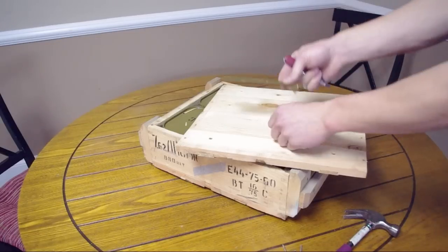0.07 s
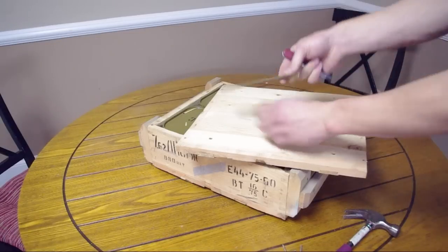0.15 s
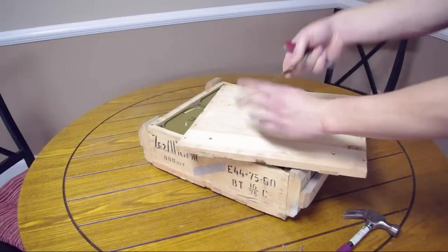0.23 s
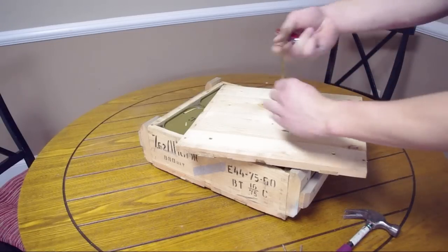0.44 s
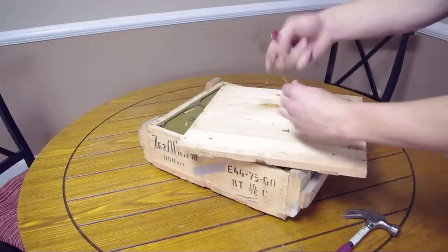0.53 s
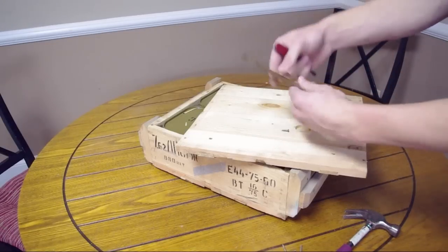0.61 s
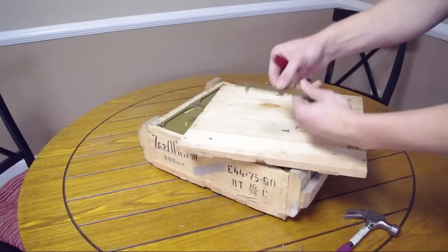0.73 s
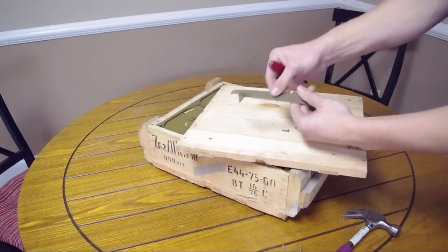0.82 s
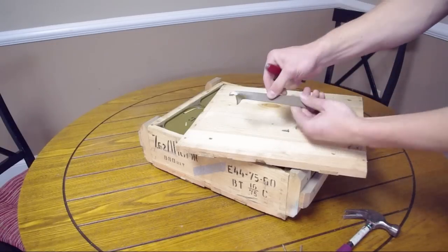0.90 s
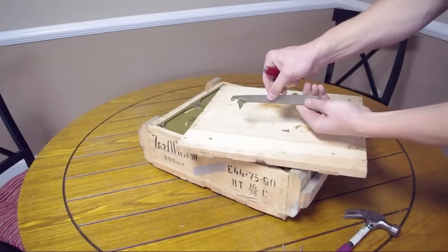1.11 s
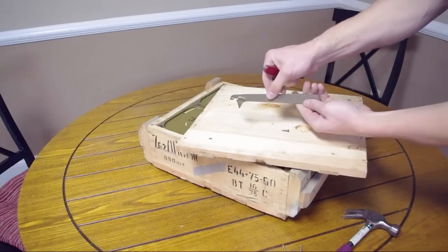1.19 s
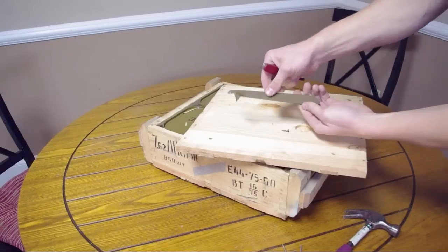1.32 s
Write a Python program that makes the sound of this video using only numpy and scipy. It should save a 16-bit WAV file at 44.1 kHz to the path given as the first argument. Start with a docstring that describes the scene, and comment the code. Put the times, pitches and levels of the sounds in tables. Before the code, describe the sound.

Two sharp, close clacks of metal on a wooden crate ring briefly in a small room with a low hum. Faint finger slides on the steel and a soft scrape across the lid follow.

```python
"""A small room with close walls, one microphone near a wooden crate; quiet air and a low hum throughout.
Arms rustle, then a flat steel bar knocks on the loose lid as it is picked up: a light clack at 0.22 s,
a firm one at 0.27 s. Bar and boards ring briefly, and the walls and the room answer.
From 0.4 s fingers slide and brush along the steel, which sings faintly. In the second half they ease
the bar into place on the lid with a soft scrape."""
import sys
import numpy as np
from scipy import signal
from scipy.fft import rfft, irfft, next_fast_len
from scipy.io import wavfile
from scipy.ndimage import uniform_filter1d

SR = 44100
rng = np.random.default_rng(int(sys.argv[2]) if len(sys.argv) > 2 else 0)


def transcribe(u):
    """Save the signal u as a 16-bit wav file named by the first command-line argument.

    u: samples, shape (n,) or (channels, n), limited to [-1, 1]; the rate is SR.
    q: integer samples, one column per channel.
    """
    v = np.clip(np.atleast_2d(u).T, -1, 1)
    q = np.round(v * 32767).astype(np.int16)
    wavfile.write(sys.argv[1], SR, q)


N = 59535
TIME = np.arange(N) / SR


def undb(db):
    """Decibels to gain."""
    return 10 ** (np.asarray(db) / 20)


def at_hz(hz, table, column=1):
    """Read a table column on a log-frequency axis."""
    table = np.array(table, float)
    return np.interp(np.log(np.maximum(hz, 1)), np.log(table[:, 0]), table[:, column])


def colour(x, points):
    """Minimum-phase filter through points of (frequency [Hz], gain [dB])."""
    size = 2 * next_fast_len(N)
    cepstrum = irfft(np.log(undb(at_hz(np.fft.rfftfreq(size, 1 / SR), points))))
    cepstrum[1:size // 2] *= 2
    cepstrum[size // 2 + 1:] = 0
    return irfft(rfft(x, size) * np.exp(rfft(cepstrum)))[:N]


def tilt(x, db_per_octave, pivot_hz=1500):
    """Brighten or darken around a pivot."""
    return colour(x, [(hz, db_per_octave * np.log2(hz / pivot_hz)) for hz in (300, 12000)])


def noise(points):
    """Coloured noise of unit power."""
    x = colour(rng.standard_normal(N), points)
    return x / x.std()


def fade(start, rise, t60):
    """Quick rise and exponential decay."""
    age = np.maximum(TIME - start, 0)
    return (1 - np.exp(-age / rise)) * np.exp(-np.log(1000) * age / t60)


def swells(rows):
    """Bell-shaped swells from rows of (centre [s], half length [s], level [dB])."""
    return sum(undb(db) * np.exp(-.5 * ((TIME - at) / half) ** 2) for at, half, db in rows)


def click(at):
    """One sharp impulse."""
    return np.sinc((TIME - at) * SR)


def burst(start, t60, rise=0.0001):
    """Decaying crackle of unit energy, evened out across the spectrum."""
    x = fade(start, rise, t60) * rng.standard_normal(N)
    for _ in range(4):
        flat = irfft(np.exp(1j * np.angle(rfft(x))), N)
        x = flat * np.sqrt(fade(start, rise, 2 * t60))
    return x / np.sqrt(np.sum(x ** 2))


def ring(modes, start, rise=0.00049):
    """Decaying modes set off together, neighbours in opposite sense."""
    return sum((-1) ** k * undb(db) * fade(start, rise, t60) * np.sin(2 * np.pi * hz * (TIME - start))
               for k, (hz, db, t60) in enumerate(modes))


# air all round the microphone (frequency [Hz], relative level [dB])
AIR = [(25, -55), (60, -27), (95, -20), (125, -12), (200, -10), (320, -8), (520, -7.5), (900, -12),
       (1750, -14), (2400, -15.5), (5000, -19.5), (8000, -21.5), (11000, -27), (13500, -37), (15000, -45)]

def room_tone(air_db=-56.5, hum_db=-67, hum_hz=239.7):
    """Steady room noise with a low hum."""
    hum = np.sqrt(2) * np.sin(2 * np.pi * hum_hz * TIME)
    return undb(air_db) * noise(AIR) + undb(hum_db) * hum


# arm movements beside the crate (centre [s], half length [s], level [dB])
RUSTLES = [(0.02, 0.066, -57), (1.22, 0.025, -59.5), (1.295, 0.013, -62.5)]
# their dull spectrum (frequency [Hz], relative level [dB])
RUSTLE_COLOUR = [(100, -24), (300, 7.5), (550, 14), (750, 5.5), (1000, 0.5), (2000, -8.5), (8000, -31)]

def arm_rustle():
    """Moving arms give soft swells of noise."""
    return swells(RUSTLES) * noise(RUSTLE_COLOUR)


# pushes of the bar across the lid (centre [s], half length [s], level [dB])
SCRAPES = [(0.76, 0.12, -63.5), (0.95, 0.095, -66.5), (1.09, 0.11, -62)]
# steel on wood (frequency [Hz], relative level [dB])
SCRAPE_COLOUR = [(300, -31), (800, -1.5), (1100, -7), (1500, 2.5), (1850, 2), (2400, -10), (4200, -7),
                 (8000, -29)]

def bar_scrape():
    """The bar rubs over the boards as it slides into place."""
    return swells(SCRAPES) * noise(SCRAPE_COLOUR)


# finger slides on the bar (centre [s], half length [s], hiss [dB], push on the modes over hiss [dB])
SLIDES = [(0.418, 0.016, -63.5, 18), (0.937, 0.04, -66.5, 23), (1.063, 0.029, -58.5, 6),
          (1.146, 0.021, -57.5, 0), (1.33, 0.0065, -52, 8)]
# light brushes on the bar (time [s], ring gain [dB], scratch level [dB])
BRUSHES = [(0.455, -9, -54.5), (0.552, -1, -57)]
# hiss of skin on steel (frequency [Hz], relative level [dB])
FRICTION = [(1500, -30), (4000, -23), (6000, -1.5), (7300, -0.5), (8300, 2.5), (9700, -2), (10500, -6),
            (12000, -14), (15000, -24)]
# a sliding finger's push on the modes (frequency [Hz], relative level [dB])
PUSH_COLOUR = [(4000, -12), (5800, 0), (8300, -8), (10800, 0), (13000, -9)]
# modes of the lifted bar (frequency [Hz], relative level [dB], t60 [s])
FREE_BAR = [(5760, -53.5, 0.15), (6600, -60, 0.16), (7650, -66, 0.18), (8340, -55, 0.14), (9700, -60, 0.13),
            (10550, -60.5, 0.17), (10880, -64, 0.17), (12650, -73, 0.13)]

def fingers_on_steel(brush_rise_s=0.0041, scratch_t60_s=0.084):
    """Skin hisses on the steel; brushes set the bar ringing and slides make it sing."""
    rubbing = swells([(at, half, db) for at, half, db, _ in SLIDES])
    rings = np.zeros(N)
    for at, ring_db, scratch_db in BRUSHES:
        rubbing += undb(scratch_db) * fade(at, brush_rise_s, scratch_t60_s)
        rings += undb(ring_db) * ring(FREE_BAR, at, brush_rise_s)
    hiss = rubbing * noise(FRICTION)
    push = swells([(at, half, db + push_db) for at, half, db, push_db in SLIDES]) * noise(PUSH_COLOUR)
    singing = signal.fftconvolve(push, ring(FREE_BAR, 0))[:N]
    return hiss + rings + singing


# tail of the small room (frequency [Hz], gain [dB], t60 [s])
ROOM = [(131, -25, 0.24), (258, -9.5, 0.5), (420, 8, 0.99), (710, 0, 0.83), (1000, 5.5, 0.5),
        (1220, 0, 0.73), (1870, 1, 0.66), (2360, 2.5, 0.22), (2750, 3, 0.64), (3260, -1, 0.47),
        (3870, 1, 0.56), (4950, -2.5, 0.19), (5450, -1, 0.36), (6100, -9, 0.91), (6740, -8.5, 0.4),
        (7460, -9.5, 0.17), (10100, -38, 0.24), (14800, -58, .1)]

def room_tail(x, delay_s=0.0015, rise_s=0.0031):
    """Diffuse sound dies away in sixth-octave bands, the highest first."""
    response = np.zeros(N)
    white = rfft(rng.standard_normal(N))
    octave = np.log2(np.maximum(np.fft.rfftfreq(N, 1 / SR), 1))
    for hz in 125 * 2 ** np.arange(0, 7.1, 1 / 6):
        share = np.maximum(1 - 6 * abs(octave - np.log2(hz)), 0)
        band = irfft(white * share, N)
        envelope = fade(delay_s, rise_s, at_hz(hz, ROOM, column=2))
        response += undb(at_hz(hz, ROOM)) * band * envelope / np.sqrt(np.sum(envelope ** 2))
    return signal.fftconvolve(x, response)[:N]


# table, walls and ceiling, by paths 1-12 m longer than the direct one (delay [s], relative level [dB])
ECHOES = [(.00259, -21), (.00678, -14.5), (.00832, -21.5), (0.0098, -18), (0.01045, -12), (0.0114, -14),
          (0.01314, -18), (0.0235, -24), (0.0264, -17.5), (.03419, -21.5)]
# tone of these echoes (frequency [Hz], gain [dB])
ECHO_COLOUR = [(300, 2.5), (1600, 6.5), (3000, 4), (6500, -6.5), (10500, 3.5)]

def reflections(x, smear_t60_s=0.0027, smear_db=-3):
    """Nearby surfaces send slightly smeared echoes to the microphone."""
    response = sum(undb(db) * (click(delay) + undb(smear_db) * burst(delay, smear_t60_s))
                   for delay, db in ECHOES)
    return colour(signal.fftconvolve(x, response)[:N], ECHO_COLOUR)


# knocks of bar on lid, near the microphone (time [s], crack gain [dB], crack tilt [dB/octave],
# crate gain [dB], bending gain [dB], clink gain [dB], tail gain [dB], tail tilt [dB/octave])
CLACKS = [(0.2207, -1, 0, 2.5, -11.5, -8.5, -8, -1), (0.2710, 0.5, 1, -0.5, 2, 2.5, 0.5, 0.5)]
# crack of the contact (frequency [Hz], gain [dB])
CRACK = [(100, -39), (260, -20), (420, 0.5), (1000, -4), (2300, -2.5), (4000, -3.5), (4900, -1.5),
         (6500, 0.5), (7400, -4), (8200, -5), (9400, -22), (10400, -19), (11400, -25), (12300, -37),
         (15000, -49)]
# modes of crate and bar (frequency [Hz], relative level [dB], t60 [s])
BOARDS = [(444, -42.5, 0.053), (623, -37, 0.021), (1018, -39.5, 0.043), (1290, -47.5, 0.075),
          (1497, -47, 0.071), (1565, -37.5, 0.12), (1825, -45, 0.076), (1886, -44.5, 0.1)]  # the loose lid
CAVITY = [(421, -43.5, 0.39)]  # the crate's hollow note, slow to build
BENDING = [(2783, -29, 0.058), (3094, -33, 0.065), (3553, -23.5, 0.021), (3650, -18.5, 0.013),
           (4210, -27.5, 0.018), (4470, -24, 0.0086), (5470, -29, 0.021), (5900, -24, 0.0089)]  # the bar, damped by the hand
CLINK = [(6390, -21, 0.017), (6770, -19, 0.013), (8340, -50, 0.0059), (10500, -44, 0.0031)]  # the bar's short, bright modes

def clacks(snap_db=-6, crack_t60_s=0.0122):
    """Each knock cracks and rings crate and bar; gives the direct sound and impulses for the room."""
    direct, impulses = np.zeros(N), np.zeros(N)
    for at, crack_db, crack_tilt, crate_db, bending_db, clink_db, tail_db, tail_tilt in CLACKS:
        contact = undb(snap_db) * click(at) + burst(at, crack_t60_s)
        direct += undb(crack_db) * tilt(colour(contact, CRACK), crack_tilt)
        direct += undb(crate_db) * (ring(BOARDS, at) + ring(CAVITY, at, rise=0.033))
        direct += undb(bending_db) * ring(BENDING, at)
        direct += undb(clink_db) * ring(CLINK, at, rise=0.00015)
        impulses += undb(tail_db) * tilt(click(at), tail_tilt)
    return direct, impulses


def scene(room_send_db=-24.5):
    """At the microphone, in mono: clacks and the room's answer, faint handling, room tone."""
    direct, impulses = clacks()
    echoes = reflections(direct)
    tail = room_tail(impulses + undb(room_send_db) * direct)
    handling = fingers_on_steel() + bar_scrape() + arm_rustle()
    return (direct + echoes + tail + handling + room_tone())[None]


def record(dry):
    """The recorder cuts the treble above 15 kHz."""
    return signal.sosfilt(signal.ellip(8, .2, 70, 15000, fs=SR, output="sos"), dry)


dry = scene()
out = record(dry)
transcribe(out)
```